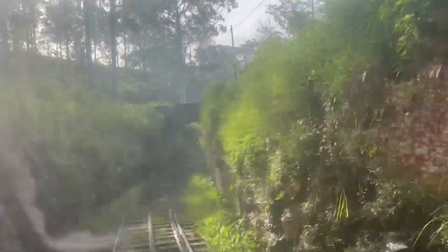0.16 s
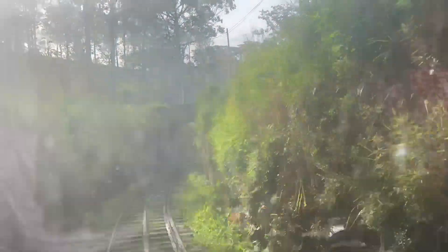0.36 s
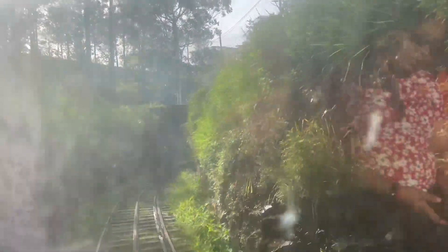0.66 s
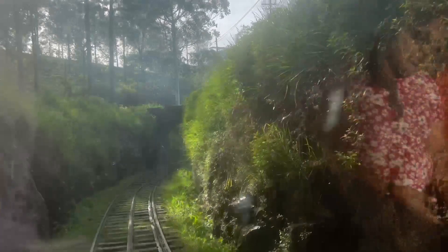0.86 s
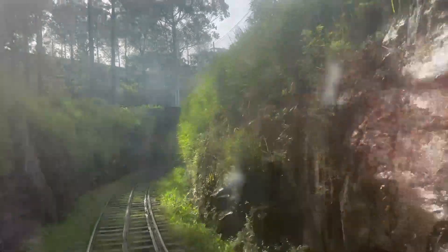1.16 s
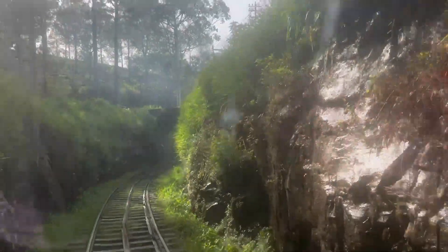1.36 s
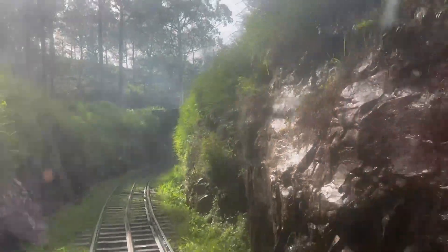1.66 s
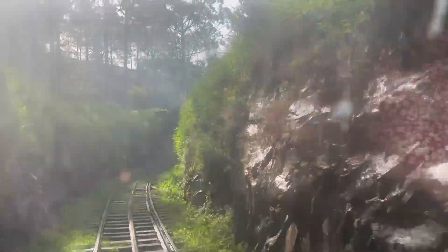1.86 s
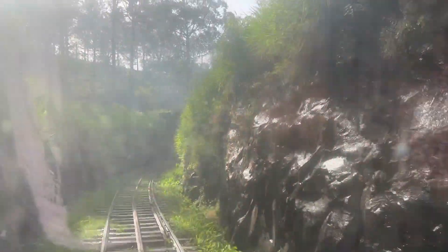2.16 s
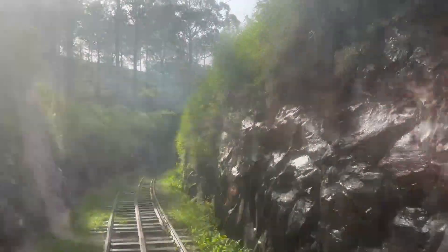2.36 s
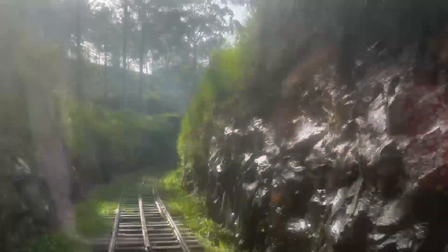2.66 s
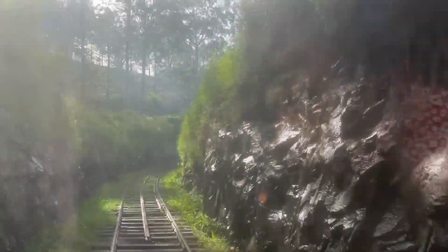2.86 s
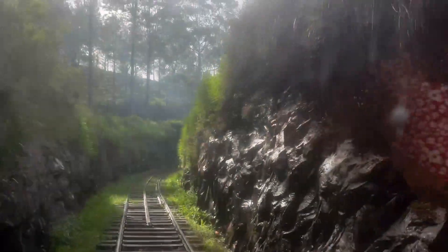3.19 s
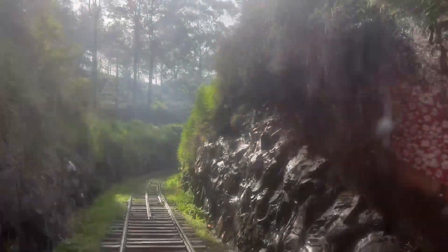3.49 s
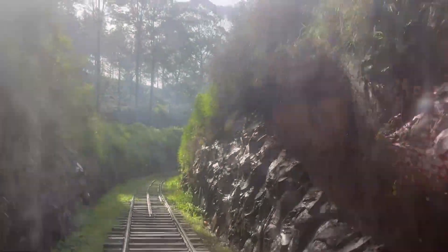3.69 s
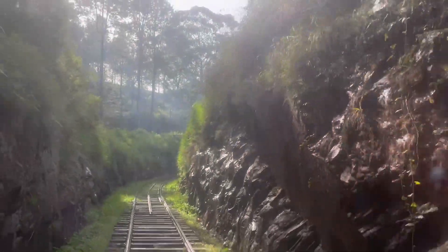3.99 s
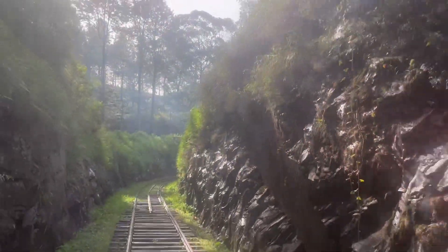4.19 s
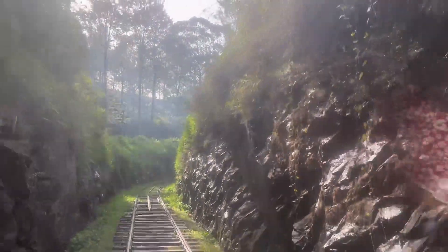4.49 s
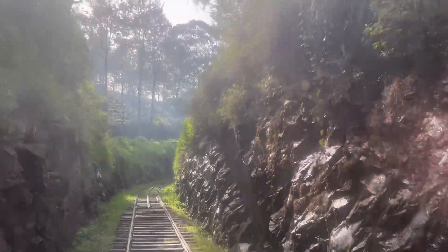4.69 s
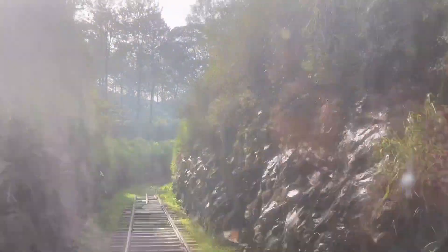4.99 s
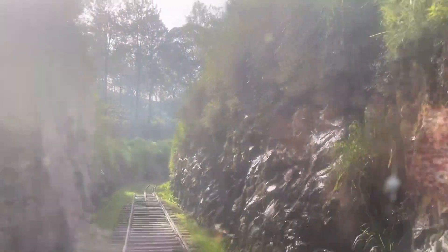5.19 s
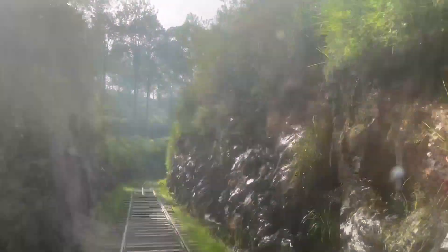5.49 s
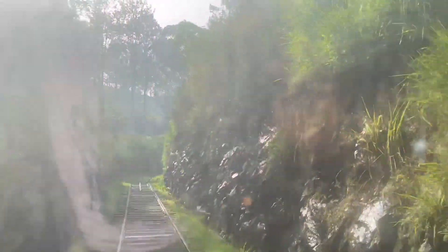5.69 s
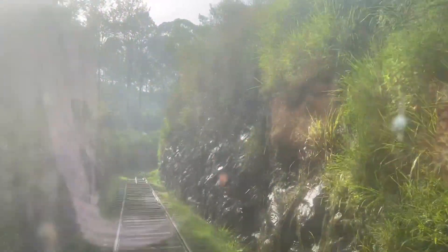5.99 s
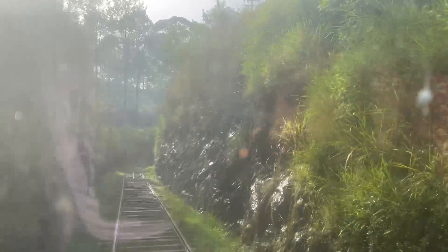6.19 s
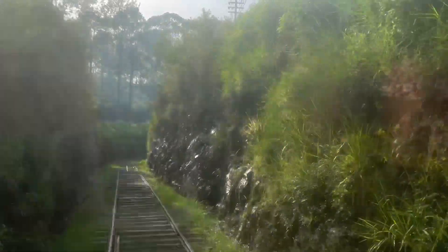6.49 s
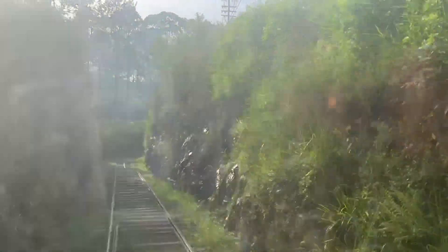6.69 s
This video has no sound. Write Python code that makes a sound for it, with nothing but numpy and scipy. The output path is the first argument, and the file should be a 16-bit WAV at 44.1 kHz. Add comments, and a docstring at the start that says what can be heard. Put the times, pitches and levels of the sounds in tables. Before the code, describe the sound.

A stereo microphone within a moving train carriage picks up boomy floor vibration and mid-low roar, constantly shifting in strength. Rail joints and loose parts clack at uneven intervals, some sharp and bright, others smeared and dull. The floor thuds hard just after one second and again past three seconds, wheels faintly ring and squeak, then the ride becomes smoother and quieter before a few stronger clacks close it.

```python
"""Rolling noise inside the rear carriage of a slow train in a rock cutting: coloured noise bands for floor rumble,
bogie drone, body boom, rail roar, hiss and fizz, each on its own level curve. Rail joints and loose parts clack:
smeared bursts of wheel-coloured noise. Wheel and panel modes sing now and then as wandering tones, and
the floor panel thumps as a damped resonance. A filtered middle and side make the stereo field."""
import sys
import numpy as np
from scipy import signal
from scipy.fft import rfft, irfft, next_fast_len
from scipy.io import wavfile
from scipy.ndimage import uniform_filter1d, map_coordinates

SR = 44100
rng = np.random.default_rng(int(sys.argv[2]) if len(sys.argv) > 2 else 0)


def wav_record(signal):
    """Record a signal, one row per channel, as 16-bit PCM in the file named by sys.argv[1]."""
    frames = np.transpose(np.atleast_2d(signal))
    bounded = np.clip(frames, -1, 1)
    # unit amplitude maps onto the largest positive 16-bit level
    quanta = np.round(bounded * 32767).astype(np.int16)
    wavfile.write(sys.argv[1], SR, quanta)


N = 302085


def amp(db):
    """Decibels to gain."""
    return 10 ** (np.asarray(db) / 20)


def unit(x):
    """Scale to rms 1."""
    return x / np.sqrt(np.mean(x ** 2) + 1e-20)


def along(points, hz):
    """Read (f/Hz, value) points on a log frequency axis."""
    f, value = np.transpose(points)
    return np.interp(np.log(hz + 1), np.log(f + 1), value)


def curves(rows):
    """One value per sample for each column after the time."""
    time_s, *columns = np.transpose(rows)
    return [np.interp(np.arange(N) / SR, time_s, column) for column in columns]


def coloured(spectrum):
    """Response of a (f/Hz, level/dB) table."""
    return lambda hz: amp(along(spectrum, hz))


def filtered(x, response):
    """Multiply the spectrum of x by a response of frequency."""
    m = next_fast_len(N + 8192)
    return irfft(rfft(x, m) * response(np.fft.rfftfreq(m, 1 / SR)), m)[..., :N]


def peak(f, hz, width_hz):
    """Magnitude of one resonance, 1 at its centre."""
    return np.abs(f * width_hz / (hz * hz - f * f + 1j * f * width_hz))


def rolling():
    """Rail roughness shakes floor, bogie, body panels and rails; bumps move hiss and fizz together."""
    # rolling noise in the carriage: t/s, floor rumble/dB, bogie drone/dB, body boom/dB
    roll_levels = [(0.0, -26, -38, -24), (0.04, -22, -32, -20), (0.27, -21, -24.5, -28.5),
                   (0.72, -21, -34, -21.5), (0.82, -14.5, -30.5, -24.5), (1.07, -27, -23, -27),
                   (1.15, -20, -21, -22), (1.2, -18.5, -27, -15), (1.43, -22, -26, -28.5),
                   (1.51, -17.5, -24.5, -20), (2.19, -18.5, -24.5, -24.5), (2.29, -30, -24, -22),
                   (2.38, -21.5, -24.5, -26), (2.88, -23.5, -25, -23), (3.28, -18.5, -17, -17),
                   (3.32, -21.5, -17.5, -21.5), (3.53, -22.5, -27, -22), (4.48, -25, -27, -24.5),
                   (4.67, -37, -22, -27), (4.75, -27, -21, -27), (5.25, -29, -27.5, -23),
                   (5.38, -19, -18.5, -26), (6.32, -25, -31, -26.5), (6.81, -20.5, -25, -22.5),
                   (6.85, -16, -26, -16)]
    # roar of the rails: t/s, lower band/dB, upper band/dB
    rail_levels = [(0, -27.5, -26), (.07, -28.5, -36.5), (.23, -32, -33), (.29, -24.5, -26),
                   (.42, -29, -32.5), (.65, -24, -30.5), (.9, -24.5, -28.5), (1.08, -22.5, -30.5),
                   (1.14, -20.5, -19), (1.18, -27, -31), (1.32, -28.5, -30), (1.47, -20.5, -28),
                   (1.53, -22.5, -22.5), (1.62, -19.5, -25.5), (1.76, -25, -22.5), (1.81, -18, -19.5),
                   (2, -24, -24.5), (2.22, -24.5, -27.5), (2.27, -24, -23), (2.34, -20, -26.5),
                   (2.42, -29.5, -32.5), (2.47, -20, -18), (2.54, -29.5, -30), (2.6, -23.5, -21),
                   (2.66, -23.5, -19), (2.72, -20.5, -25), (2.82, -29.5, -25), (2.9, -18.5, -19.5),
                   (2.97, -18, -23), (3.07, -19, -24), (3.15, -23.5, -27), (3.32, -21.5, -25),
                   (3.47, -22, -37.5), (3.55, -31, -33), (4.05, -33, -35.5), (4.6, -32.5, -36),
                   (5, -32, -41.5), (5.15, -36.5, -41), (5.38, -39, -42), (5.45, -34.5, -35.5),
                   (5.55, -31.5, -44), (5.7, -36, -41.5), (5.85, -35.5, -40), (6.1, -33.5, -41.5),
                   (6.3, -33, -35.5), (6.45, -23, -28.5), (6.52, -35.5, -37), (6.62, -34.5, -36),
                   (6.68, -19.5, -33), (6.73, -38, -42), (6.79, -17, -33), (6.85, -29, -35)]
    # rolling contact: t/s, hiss/dB, fizz of small shaken parts/dB, top of the fizz over the fizz/dB
    contact_levels = [(0, -39, -49.5, -9), (.12, -40, -51, 4), (.3, -36, -47, -3), (.5, -35.5, -42, 7.5),
                      (.65, -36.5, -48, 1), (.8, -39.5, -50.5, -2.5), (1.08, -34, -50.5, -1.5),
                      (1.22, -37.5, -44, -3), (1.36, -31.5, -43, -2), (1.66, -31, -41.5, -1),
                      (1.95, -31.5, -44, 1), (2.22, -35.5, -40, 4.5), (2.36, -36.5, -49, 3.5),
                      (2.7, -36.5, -47, 0.5), (3.09, -32, -44, 0.5), (3.35, -29, -40, -2),
                      (3.6, -38, -53, -10), (3.72, -38, -55, -8), (3.87, -40.5, -48.5, -3),
                      (4.15, -42, -58.5, -2), (4.5, -41.5, -48.5, -3), (4.75, -43.5, -63.5, 5.5),
                      (5.15, -47.5, -68, 9), (5.46, -37, -47.5, -3), (5.8, -38, -46, 6),
                      (6.1, -45.5, -59.5, -1), (6.5, -35.5, -47.5, 0.5), (6.85, -45, -53, -0.5)]
    # floor rumble spectrum: f/Hz, level/dB
    rumble_spectrum = [(11, -40), (20, -27), (36, -12.5), (48, -0.5), (59, 1.5), (70, -6.5), (85, -5.5),
                       (110, -42), (190, -120)]
    # bogie drone spectrum: f/Hz, level/dB
    drone_spectrum = [(55, -11.5), (75, 13), (97, 14), (120, 11), (160, -43.5)]
    # body panel boom spectrum: f/Hz, level/dB
    boom_spectrum = [(65, -43), (110, -5.5), (157, 3), (232, -7), (320, -8.5), (420, -39), (700, -120)]
    # lower rail roar spectrum: f/Hz, level/dB
    roar_spectrum = [(150, -40), (260, 1), (301, -6), (333, 0.5), (392, -4), (450, -5.5), (600, -43),
                     (1200, -120)]
    # upper rail roar spectrum: f/Hz, level/dB
    roar_top_spectrum = [(250, -60), (400, -7.5), (480, 1), (600, -3.5), (720, -10), (888, -14.5),
                         (1000, -15.5), (1300, -46.5), (2200, -120)]
    # contact hiss spectrum: f/Hz, level/dB
    hiss_spectrum = [(440, -7.5), (750, 1), (908, -3.5), (1010, -1), (1570, -5.5), (4740, -20.5),
                     (6000, -37.5), (7800, -48), (13200, -120)]
    # fizz spectrum: f/Hz, level/dB
    fizz_spectrum = [(4000, -8.5), (5500, -10.5), (9000, -15.5), (10500, -13.5), (12000, -77)]
    # top of the fizz spectrum: f/Hz, level/dB
    fizz_top_spectrum = [(8000, -81), (9000, -5.5), (11000, -1), (12500, 2), (14500, 0), (16000, -2.5)]

    rumble_db, drone_db, boom_db = curves(roll_levels)
    roar_db, roar_top_db = curves(rail_levels)
    hiss_db, fizz_db, tilt_db = curves(contact_levels)
    bumps = rattle(per_s=14, fade_s=.027, size=200)

    rumble = amp(rumble_db + 0.74 * wobble(5.8)) * rush(coloured(rumble_spectrum), patchy_db=-1.5)
    drone = amp(drone_db + 1.6 * wobble(10.0)) * rush(coloured(drone_spectrum), patchy_db=0.5)
    boom = amp(boom_db + 0.79 * wobble(9)) * rush(coloured(boom_spectrum), patchy_db=-0.07)
    roar = amp(roar_db + 1.0 * wobble(14)) * rush(coloured(roar_spectrum), patchy_db=2.0)
    roar_top = amp(roar_top_db + 0.76 * wobble(16)) * rush(coloured(roar_top_spectrum), patchy_db=2.0)

    hiss = rush(coloured(hiss_spectrum), patchy_db=1.5)
    hiss = hiss + amp(-7.0) * clinks(coloured(hiss_spectrum), count=2200)
    hiss = amp(hiss_db + 1.25 * bumps) * hiss
    fizz = rush(coloured(fizz_spectrum), patchy_db=3.0)
    fizz = fizz + amp(tilt_db) * rush(coloured(fizz_top_spectrum), patchy_db=5.5)
    fizz = amp(fizz_db + 1.0 * bumps + 1.6 * wobble(12)) * fizz
    return rumble + drone + boom + roar + roar_top + hiss + fizz


def clacks():
    """A blow reaches the cabin through many paths, as a burst that swells quickly, holds and dies, treble first."""
    # rail joints and loose parts: t/s, level/dB, low band over it/dB, treble over it/dB, rise scale/ms
    blows = [(.269, -43.5, 7, 7.5, 15), (.323, -43, -12, -5, 14), (.489, -38.5, -2, 6, 14),
             (0.704, -39.5, 7, 1.5, 9.2), (1.012, -46, 12.5, 1, 14), (1.13, -37.5, 6, 6, 15),
             (1.3, -42.5, 9, -6, 15), (1.598, -39, 10.5, 7, 5), (1.728, -32.5, 0, 2.5, 9),
             (1.876, -38.5, -12, 9.5, 14), (1.959, -43.5, -21, 15.5, 8), (1.987, -50.5, 14.5, -1, 4),
             (2.021, -31.5, 2.5, 2.5, 5.4), (2.042, -31, -19, 7.5, 5), (2.199, -36, -6, 2, 9),
             (2.445, -37.5, 7, 7, 9), (2.588, -46, 12.5, -7, 4), (2.653, -47, 14.5, -9, 4),
             (2.759, -46, 15.5, -11, 14), (2.85, -29.5, 3, 4.5, 26), (3.139, -32, -2.5, -10, 14),
             (3.307, -51, 9.5, 9, 14), (3.468, -43, -1, 12, 14), (3.598, -43.5, 7, 7.5, 14),
             (3.76, -34.5, -1, 6.5, 4), (4.052, -54, 13, -2, 5.8), (4.197, -42.5, 5.5, -4.5, 9),
             (4.319, -43.5, -10, -2, 14), (4.499, -47, 5, -3, 14), (4.581, -35.5, 1, 2, 9),
             (4.756, -42, 0.5, 3, 14), (4.888, -35, 6.5, 7, 19), (5.05, -54, 13.5, 12, 9),
             (5.165, -59.5, 9, 22, 4), (5.2, -46, 4.5, 10, 9), (5.437, -48, 13.5, 7, 17),
             (5.509, -38.5, -14, 5, 14), (5.659, -49.5, -2, 15.5, 9), (5.78, -60.5, 19.5, 26, 5),
             (5.915, -50.5, 8.5, -3, 11), (6, -48.5, 11, 12.5, 11), (6.108, -56.5, 15, 21, 4),
             (6.209, -41, 0.5, 4, 14), (6.34, -32.5, 0, 8.5, 14), (6.529, -48.5, 2, 14.5, 9),
             (6.645, -35.5, 2, 0, 15), (6.665, -34.5, -10, 7, 9), (6.792, -39.5, 7.5, -4.5, 16)]
    # burst spectrum: f/Hz, level/dB
    burst_spectrum = [(500, 0), (800, 1), (1500, -5.5), (3000, -7), (4700, -12.5), (5500, -20),
                      (6500, -21.5), (9000, -26), (16000, -21), (17000, -100)]
    # modes of the struck wheel: f/Hz, width/Hz, level/dB
    wheel_modes = [(1323, 145, -1), (1840, 15, 5.5), (2365, 70, -2.5), (2840, 60, -6), (4020, 97, -7.5),
                   (4620, 38, 0)]
    lead, hold_s, t60_s = 0.86, 0.03, 0.53  # lead: share of the rise scale before the blow
    usual_db, longer_per_db = -35, 0.0245  # harder blows die more slowly
    # rows: low, centre, treble
    life = np.array([[1.1], [1], [.75]])  # share of t60
    rise_share = np.array([[1.2], [0.95], [0.8]])

    power, lean = np.zeros((3, N + SR)), np.zeros(N + SR)
    t = np.arange(SR) / SR
    sides = np.tanh(-0.1 + 0.25 * rng.standard_normal(len(blows)))
    for (s, db, low_db, treble_db, rise_ms), side in zip(blows, sides):
        start = max(round((s - lead * rise_ms / 1000) * SR), 0)
        stretch = np.exp(longer_per_db * (db - usual_db))
        swell = 1 - np.exp(-(t * 1000 / (rise_ms * rise_share)) ** 2)
        decay_db = -60 * np.maximum(t - hold_s, 0) / (life * stretch * t60_s)
        bands = (amp(db) * swell * amp([[low_db], [0], [treble_db]] + decay_db)) ** 2
        power[:, start:start + SR] += bands
        lean[start:start + SR] += bands[1] * side

    def clang(f):
        ringing = sum(amp(db) * peak(f, hz, width_hz) for hz, width_hz, db in wheel_modes)
        return amp(along(burst_spectrum, f)) * (1 + 1.07 * ringing)

    noise = rush(clang, patchy_db=0.45) + amp(-9.5) * clinks(clang, count=2200)
    # a clack is a flurry of small hard contacts
    noise = noise * amp(1.1 * rattle(per_s=350, fade_s=.002, size=12))
    under = [filtered(noise, lambda f: 1 / (1 + (f / hz) ** 6)) for hz in (1500, 5200)]
    parts = np.diff([0 * noise, *under, noise], axis=0)
    pair = np.sum(parts * np.sqrt(power[:, None, :N]), axis=0) / np.std(parts[1])
    # a blow off centre adds a share of the first part to the second
    pair[1] += 1.6 * pair[0] * (lean / (power[1] + 1e-12))[:N]
    return pair


def wheel_song():
    """Each mode is a tone whose size, phase and pitch wander at random: rolling keeps striking it."""
    # singing wheel and panel modes: t/s, f/Hz, level/dB, length/s
    notes = [(.01, 4610, -52, .26), (0.022, 4470, -59, 0.13), (0.002, 331, -29, 0.313),
             (0.308, 4630, -39.5, 0.063), (0.321, 4460, -49, 0.075), (0.358, 4570, -45, 0.084),
             (0.407, 4520, -52, 0.099), (.46, 12300, -53, .12), (1.157, 1860, -38, 0.062),
             (1.195, 1826, -35, 0.051), (1.243, 2350, -42, 0.054), (1.126, 4400, -45, 0.1),
             (1.161, 4600, -47, 0.077), (1.17, 5120, -48, .04), (1.22, 4450, -47, 0.065),
             (1.272, 4460, -45.5, 0.04), (1.286, 1038, -34.5, 0.1), (1.391, 1035, -32.5, 0.11),
             (1.472, 1009, -36.5, 0.17), (1.481, 518, -22, 0.14), (1.724, 4570, -36.5, 0.06),
             (1.727, 3950, -36, 0.045), (1.729, 1320, -35, 0.044), (1.79, 524.4, -21, 0.18),
             (2.039, 3830, -37, 0.09), (2.045, 4650, -48, .06), (2.023, 12500, -53, .27),
             (2.034, 1198, -28, 0.048), (2.092, 1874, -34.5, 0.075), (2.088, 1367, -30, 0.064),
             (2.225, 1344, -36, 0.046), (2.652, 580, -21, 0.021), (2.851, 1332, -30.5, 0.043),
             (2.745, 780, -27, 0.031), (2.755, 1370, -39, 0.17), (2.926, 1358, -36, 0.25),
             (3.134, 1030, -29, .038), (3.18, 1392, -36, 0.18), (3.217, 1040, -30, 0.043),
             (3.5, 1030, -46, .06), (3.311, 1386, -39, 0.1), (3.312, 1040, -31, 0.071),
             (3.448, 1018, -30, 0.061), (3.562, 1030, -34, 0.051), (3.661, 1010, -34, 0.06),
             (3.712, 1050, -38.5, 0.04), (4.582, 3870, -45, 0.081), (4.58, 4600, -47, .05),
             (4.76, 1047, -43, 0.1), (4.902, 2450, -43, .05), (5.064, 1015, -39, 0.06),
             (5.429, 902, -38.5, 0.084), (5.602, 1050, -47, .12), (6.21, 1880, -46, 0.089),
             (6.345, 4350, -40, .035), (6.673, 4200, -43, .03), (6.338, 2455, -38, 0.044),
             (6.4, 1414, -35.5, .11), (6.633, 1028, -35, 0.068), (6.776, 734, -32.5, 0.059)]
    # mode bandwidth: f/Hz, width/Hz
    mode_widths = [(330, 32.7), (520, 130.3), (1030, 90), (1200, 210), (1370, 250), (1390, 60), (1850, 120),
                   (3860, 340), (4350, 480), (4600, 148), (12300, 600)]
    waver_hz, waver_per_s, climb_hz = 12, 25, 30  # random pitch drift, its knot rate, climb over each note
    steady_hz = 80  # held part = steady_hz / mode width

    out = np.zeros((2, N + SR))
    for s, hz, db, length_s in notes:
        count = round(length_s * SR)
        u = np.arange(count) / count
        width_hz = along(mode_widths, hz)
        knots = rng.standard_normal((5, 600))
        wander = np.array([map_coordinates(k, [u * length_s * width_hz]) for k in knots[:4]])
        drift_hz = waver_hz * map_coordinates(knots[4], [u * length_s * waver_per_s])
        phase = 2 * np.pi * np.cumsum(hz + drift_hz + climb_hz * (u - .5)) / SR
        shape = np.clip(u / 0.056, 0, 1) * np.clip((1 - u) / 0.53, 0, 1) ** 0.71
        tone = (steady_hz / width_hz + wander[:2]) * np.cos(phase) + wander[2:] * np.sin(phase)
        note = np.array([unit(n) for n in shape * tone])
        out[:, round(s * SR):][:, :count] += amp(db) * np.sqrt(np.mean(shape ** 2)) * note
    return out[:, :N]


def thump():
    """The floor panel rings briefly after a jolt: resonant noise plus a held tone, dying exponentially."""
    # jolts of the floor panel: t/s, level/dB, f/Hz, t60/s
    jolts = [(0.668, -15.5, 170, 0.18), (1.161, -8, 193, 0.17), (1.184, -13.5, 141, 0.23),
             (1.63, -18.5, 166, 0.22), (1.783, -20, 110, .25), (2.45, -17, 474, 0.36),
             (2.59, -21.5, 480, .25), (2.905, -20.5, 297, 0.18), (2.959, -19.5, 480, 0.24),
             (3.121, -22, 90.5, 0.13), (3.175, -16, 125, 0.12), (3.222, -10.5, 150, 0.23),
             (3.28, -15.5, 85.5, 0.22), (4.223, -20.5, 131, 0.23), (5.58, -20, 101, 0.45),
             (6.48, -23.5, 109, 0.089), (6.775, -27, 391, 0.37)]
    width_over_pitch, steady = 0.27, 2.5  # steady: held tone amplitude over the rms of the random part

    out, t = np.zeros((2, N + SR)), np.arange(SR // 2) / SR
    f = np.fft.rfftfreq(len(t), 1 / SR)
    for s, db, hz, t60_s in jolts:
        noise = rng.standard_normal((2, len(t)))
        ring = unit(irfft(rfft(noise) * peak(f, hz, width_over_pitch * hz), len(t)))
        ring = unit(ring + steady * np.sin(2 * np.pi * (hz * t + rng.random((2, 1)))))
        envelope = amp(db - 60 * t / t60_s) * (1 - np.exp(-t / 0.006))
        out[:, round(s * SR):][:, :len(t)] += envelope * ring
    return out[:, :N]


def rush(response, patchy_db):
    """Two unrelated noises, rms 1 together, sharing time-frequency patches of random gain."""
    z = signal.stft(rng.standard_normal((2, N)), nperseg=512)[2]
    patches = uniform_filter1d(rng.standard_normal(z.shape[1:]), size=5, axis=0)
    patches = unit(uniform_filter1d(patches, size=10, axis=1))
    pair = signal.istft(z * amp(patchy_db * patches), nperseg=512)[1][:, :N]
    return unit(filtered(pair, response))


def clinks(response, count):
    """Loose metal parts ring briefly at scattered pitches; rms 1, coloured by the response."""
    draw, t = rng.random((count, 5)), np.arange(SR // 25) / SR
    hz = 600 + 5000 * draw[:, 1:2] ** 1.5
    size = amp(10 * draw[:, 2:3])
    envelope = amp(-60 * t / 0.19) * (1 - np.exp(-t / 0.0037)) * (1 - t / t[-1])
    ring = size * np.sin(2 * np.pi * hz * t) * envelope
    at = (draw[:, :1] * N).astype(int) + np.arange(len(t))
    pair = []
    for k in (3, 4):  # random gain in each part of the field
        gain = np.cos(2 * np.pi * draw[:, k:k + 1])
        pair.append(np.bincount(at.ravel(), (ring * gain).ravel(), N + SR)[:N])
    return unit(filtered(np.array(pair), response))


def rattle(per_s, fade_s, size):
    """Small random bumps, mean 0 and rms 1: each jumps up, fades and is smoothed over size samples."""
    kicks = (rng.random(N) < per_s / SR) * rng.random(N)
    fade = np.exp(-np.arange(SR // 2) / SR / fade_s)
    lift = uniform_filter1d(signal.fftconvolve(kicks, fade)[:N], size=size)
    return unit(lift - lift.mean())


def wobble(knots_per_s):
    """A smooth random curve through normally distributed knots."""
    grid_s = np.arange(0, N / SR + .01, .002)
    curve = map_coordinates(rng.standard_normal(400), [grid_s * knots_per_s])
    return np.interp(np.arange(N) / SR, grid_s, curve)


def scene():
    """Sum the sources, shape a middle and a partly related side, and turn them into left and right."""
    # gain of the middle (left plus right): f/Hz, gain/dB; the middle all but vanishes between about 9.4 and
    # 10.3 kHz
    middle_gain = [(20, 2), (8600, -3), (9050, -10), (9400, -54), (10300, -35.5), (11000, -10.5),
                   (11400, -9.5), (14000, -13.5), (14700, -26), (15050, -22), (15200, -55)]
    # gain of the side (left minus right): f/Hz, gain/dB
    side_gain = [(40, -29), (110, -12), (200, -10.5), (370, -7), (690, -3.5), (1600, -3), (1900, -9),
                 (4300, -5.5), (6300, -6.5), (6900, -9), (7300, -28), (7800, -16), (8400, -2), (11600, -9),
                 (12100, -43.5), (13800, -41.5), (14800, -26), (15800, -7)]
    # part of the side following the middle a quarter cycle ahead: f/Hz, share (-1..1)
    ahead_share = [(300, 0.2), (1000, 0.71), (1500, -.5), (1900, .1), (2400, .35), (4700, .35), (5700, -.3),
                   (7500, .05), (9000, -.6)]
    # channel balance: f/Hz, left minus right/dB
    balance = [(60, 0.5), (110, 1.5), (200, -0.5), (370, 2.5), (690, 2), (1260, -2), (2320, 3.5),
               (4260, 3.5), (7840, 0.5), (14400, 0)]

    near, scattered = rolling() + clacks() + wheel_song() + thump()
    share = lambda f: np.clip(along(ahead_share, f), -.95, .95)
    across = filtered(near, lambda f: 1j * share(f))
    across = across + filtered(scattered, lambda f: np.sqrt(1 - share(f) ** 2))
    middle = filtered(near, coloured(middle_gain))
    side = filtered(across, coloured(side_gain))
    lean = lambda f: amp(np.outer([.5, -.5], along(balance, f)))
    return filtered(np.array([middle + side, middle - side]), lean)


def record(dry):
    """Soft saturation of the loudest swings, then the band limit."""
    top_hz = 15800
    soft = dry / (1 + np.abs(dry) ** 8) ** (1 / 8)
    return filtered(soft, lambda hz: hz < top_hz)


dry = scene()
out = record(dry)
wav_record(out)
```